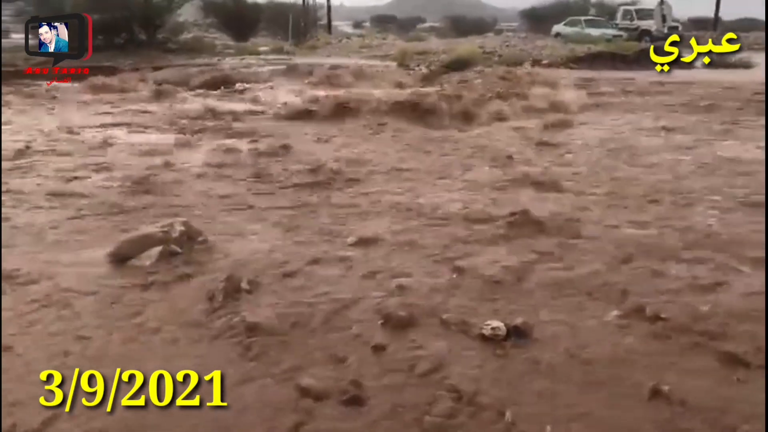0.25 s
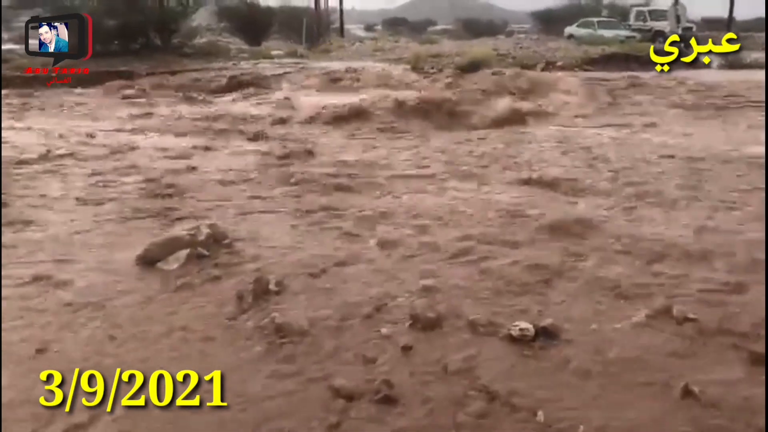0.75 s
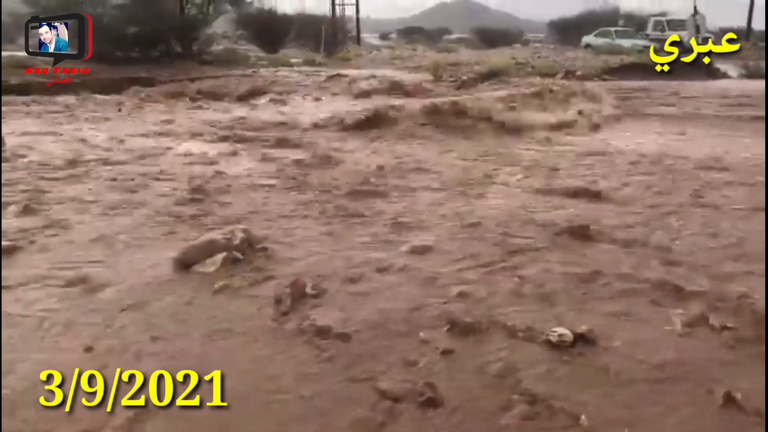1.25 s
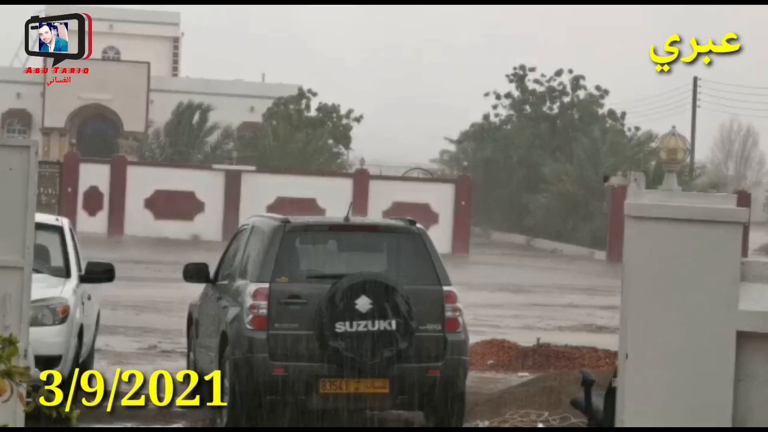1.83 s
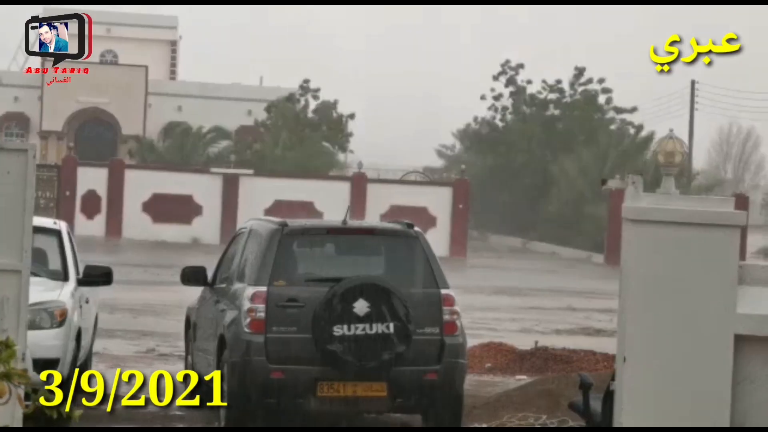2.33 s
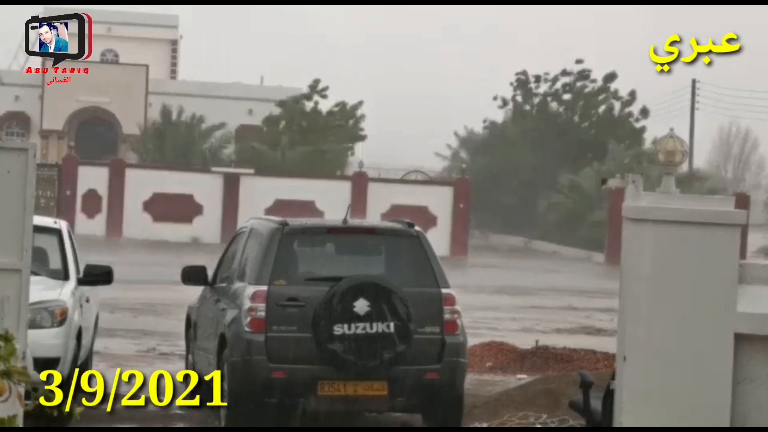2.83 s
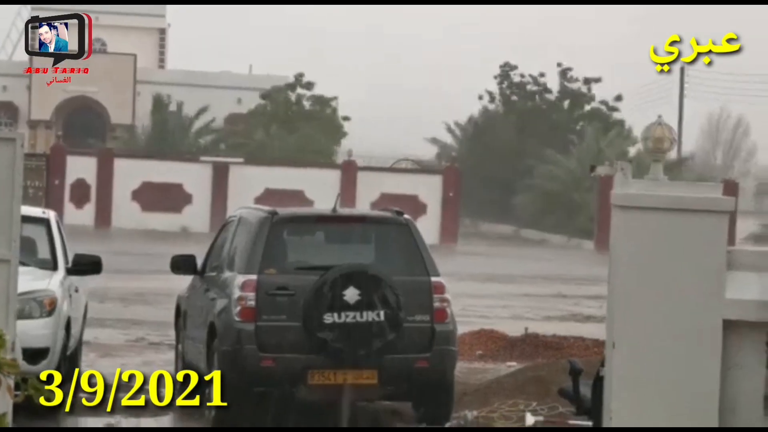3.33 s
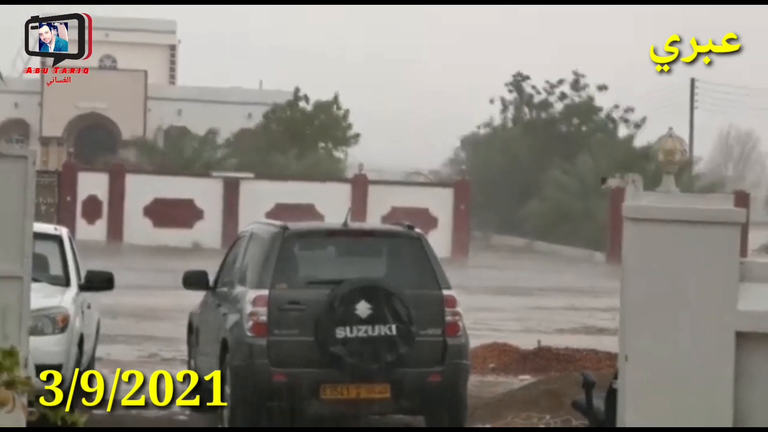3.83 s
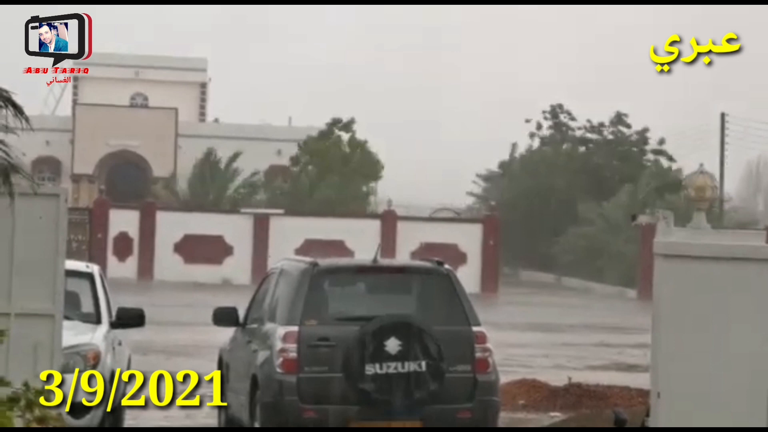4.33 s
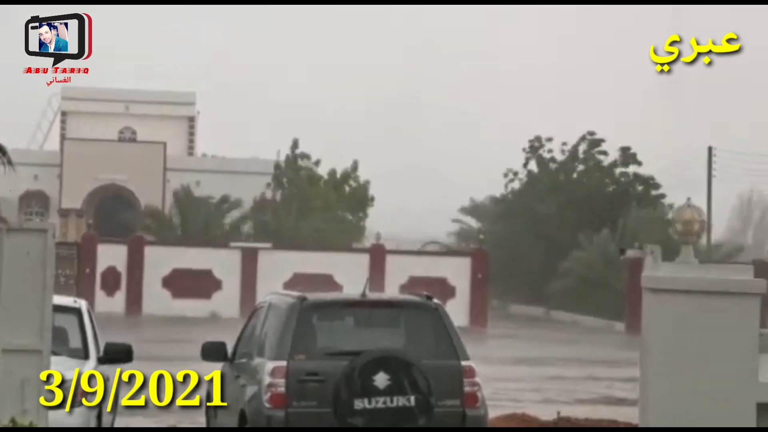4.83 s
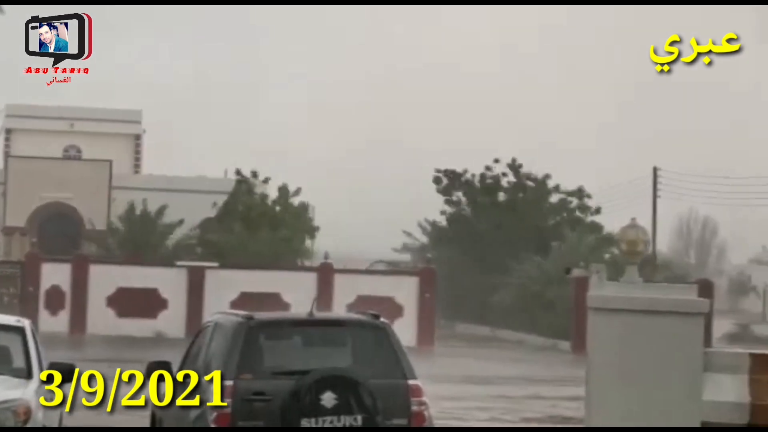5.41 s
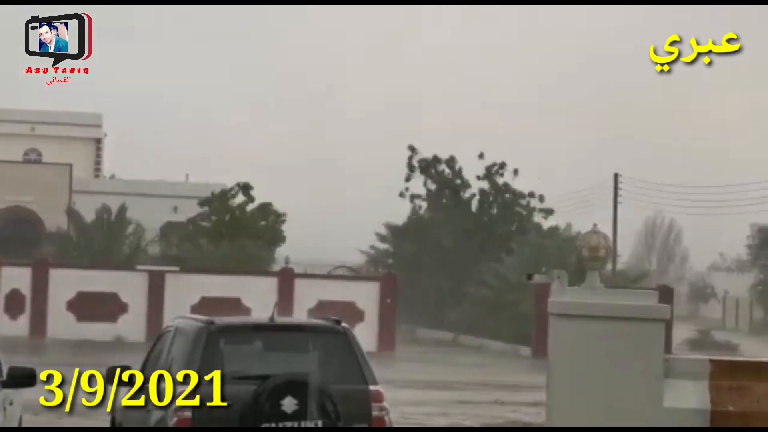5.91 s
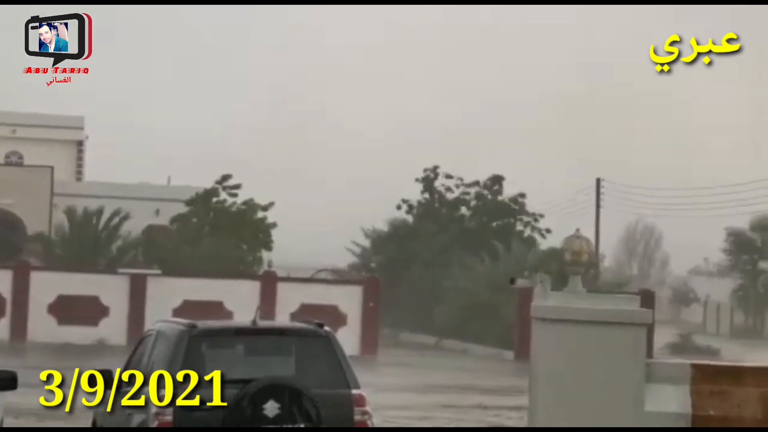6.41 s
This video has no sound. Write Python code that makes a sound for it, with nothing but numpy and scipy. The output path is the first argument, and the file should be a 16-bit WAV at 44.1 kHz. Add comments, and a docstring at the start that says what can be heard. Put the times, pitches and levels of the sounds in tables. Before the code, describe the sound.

Two outdoor scenes are joined by hard cuts. First comes a loud, dull, centred torrent of turbulent water, gurgling and slapping at rocks, with a low motor hum beneath. A brief dead silence follows. Then heavy rain heard from a porch spreads wide, crisp and quieter, with irregular splatters, sharp ticking drops, soft drumming on roofs and cars, and uneven wind rumble until the end.

```python
"""Floodwater, then a downpour

Two scenes joined by a short silence. First, in mono, muddy floodwater roars over stones: shaped noise with
bubble chirps, a hiss of spray, waves slapping as damped air pockets, and an engine drone of wavering sines.
Then, in stereo from a porch, heavy rain hisses on a yard as patchy noise and ringing drops; run-off
splashes close by as noise bursts, roofs drum and wind rumbles as filtered noise, and one low sine hums."""
import sys
import numpy as np
from scipy import signal
from scipy.fft import rfft, irfft, next_fast_len
from scipy.io import wavfile
from scipy.ndimage import uniform_filter1d, map_coordinates

SR = 44100
rng = np.random.default_rng(int(sys.argv[2]) if len(sys.argv) > 2 else 0)


def waveform_to_disk(signal):
    """Save audio, clipped to [-1, 1], as 16-bit WAV at the path in sys.argv[1]."""
    frames = np.transpose(np.atleast_2d(signal))
    scaled = np.clip(frames, -1, 1) * 32767
    samples = np.round(scaled).astype(np.int16)
    wavfile.write(sys.argv[1], SR, samples)


N = 294575
FLOOD_END, RAIN_START = 1.6637, 2.0185  # s

# Tone colour of churning water. Each row: frequency in Hz, relative density in dB per Hz.
ROAR_SPECTRUM = [(15, -53), (30, -30.5), (55, -24), (90, -1.5), (140, -2), (200, -1.5), (350, -1.5),
                 (500, -1.5), (750, -3.5), (1000, -9), (1500, -16), (2500, -21), (5000, -47.5)]
# Single big drops striking close by. Each row: start in seconds, level in dB, pitch in Hz, left over right in dB.
BIG_DROPS = [(2.1648, -22.5, 7460, -3), (2.5715, -23.5, 2930, -5), (3.216, -24, 4760, -2.5),
             (4.5156, -23, 4460, -4), (4.52, -19, 3280, 0), (4.63, -24, 7690, -9), (4.8337, -24, 7770, -9),
             (4.944, -28, 4010, -1.0), (5.3373, -27, 4130, -1.5), (5.805, -23, 6270, -5),
             (6.2956, -21, 6500, -4), (6.306, -23, 6600, -2)]


def amp(db):
    """Decibels to a linear gain."""
    return 10 ** (np.asarray(db) / 20)


def unit(x):
    """x scaled to rms 1."""
    return x / np.sqrt(np.mean(x ** 2) + 1e-20)


def along(points, hz):
    """(Hz, value) points read off along a log frequency axis."""
    f, v = np.transpose(points)
    return np.interp(np.log(hz + 1), np.log(f + 1), v)


def curves(rows):
    """One value per sample for each column after the time."""
    s, *cols = np.transpose(rows)
    return [np.interp(np.arange(N) / SR, s, c) for c in cols]


def wobble(rate):
    """A smooth random curve through rate knots a second."""
    knots = rng.standard_normal(int(N * rate / SR) + 4)
    return map_coordinates(knots, [np.arange(N) * rate / SR])


def filtered(x, response):
    """x through a gain given as a function of frequency."""
    m = next_fast_len(N + SR // 4)
    return irfft(rfft(x, m) * response(np.fft.rfftfreq(m, 1 / SR)), m)[..., :N]


def coloured(x, spectrum):
    """x through a (Hz, dB) spectrum, at rms 1."""
    return unit(filtered(x, lambda hz: amp(along(spectrum, hz))))


def patchy(patchy_db, size=(6, 6)):
    """Two white noises sharing patches of random gain, size = (frequency bins, time frames)."""
    z = signal.stft(rng.standard_normal((2, N)), nperseg=512)[2]
    field = rng.standard_normal(z.shape[1:])
    field = uniform_filter1d(field, size=size[0], axis=0)
    field = uniform_filter1d(field, size=size[1], axis=1)
    return signal.istft(z * amp(patchy_db * unit(field)), nperseg=512)[1][:, :N]


def grains(count, size, until, mid_hz, octaves, cycles, spread_db, pan_db, lag):
    """Scattered damped sines of rising pitch, each with its own level and time offset between channels."""
    when, big, turn = rng.random((3, count))
    hz = np.minimum(mid_hz * 2 ** (octaves * rng.standard_normal(count)), SR / 3)[:, None]
    t = np.arange(size) / SR
    chirp = np.sin(2 * np.pi * hz * t * (1 + 0.074 * hz * t / cycles))
    shape = chirp * np.exp(-hz * t / cycles) * np.hanning(2 * size)[size:]
    shape *= amp(-spread_db * np.log(big + 0.013))[:, None]  # a few grains stand out
    out = []
    for side in (1, -1):  # left, right
        start = (when * until * SR + SR * lag * (1 + side * (2 * turn - 1))).astype(int)
        weights = shape * amp(-side * pan_db * 2 * turn)[:, None]  # from even to leaning right
        index = (start[:, None] + np.arange(size)).ravel()
        out.append(np.bincount(index, weights.ravel(), N + SR)[:N])
    return np.array(out) / np.sqrt(np.sum(shape ** 2) / (until * SR))


def tone(hz, db, waver_hz):
    """A sine around a given pitch and rms level whose pitch and strength waver."""
    level = np.sqrt(2) * amp(db + 1.5 * wobble(23))
    phase = 2 * np.pi * np.cumsum(hz + waver_hz * wobble(14)) / SR
    return level * np.sin(phase)


def flood():
    """Turbulent water: a churning roar with big bubbles ringing in it, and the smooth hiss of spray."""
    # Swell of the roar. Each row: time in seconds, level in dB.
    roar_swell = [(0, -25.5), (.3, -26), (.38, -26.5), (.54, -26), (1.05, -25.5), (1.45, -25.5),
                  (1.66, -27.5)]
    # Tone colour of the spray. Each row: frequency in Hz, relative density in dB per Hz.
    spray_spectrum = [(710, -40), (1200, -5.5), (1580, -8), (3210, -6.5), (4040, -10.5), (5600, -10),
                      (8440, -15), (10700, -21), (11800, -25), (15300, -55.5), (22000, -120)]
    bubble_db, spray_db = -5.5, -35  # bubbles relative to the churn; spray rms
    roar_db, = curves(roar_swell)
    churn, fizz = patchy(0.93)[0], patchy(0.93)[0]
    bubbles = grains(count=900, size=900, until=FLOOD_END, mid_hz=380, octaves=.8, cycles=2.4,
                     spread_db=2, pan_db=0, lag=0)[0]
    roar = coloured(churn, ROAR_SPECTRUM) + amp(bubble_db) * bubbles
    roar *= amp(roar_db + 0.33 * wobble(8.9))
    spray = amp(spray_db) * coloured(fizz, spray_spectrum)
    return roar + spray


def engine():
    """An engine drone under the roar: three sines at one, two and three times the firing rate."""
    # The engine's changing pace. Each row: time in seconds, firing rate in Hz, third-order level in dB.
    engine_pace = [(0.0, 40, -44), (0.1, 40.5, -35), (0.208, 42.5, -41), (0.294, 42.4, -32),
                   (0.396, 39.8, -41), (0.452, 39.55, -30.5), (0.818, 35.96, -34), (1.03, 36.5, -35),
                   (1.054, 36.2, -38), (1.206, 39, -30.5), (1.446, 36.76, -36), (1.66, 34.2, -33)]
    first_db, second_db = -45, -41  # levels of the lower orders
    hz, third_db = curves(engine_pace)
    third = tone(3 * hz, third_db, waver_hz=2.5)
    first = tone(hz, first_db, waver_hz=1.1)
    second = tone(2 * hz, second_db, waver_hz=3.5)
    return first + second + third


def slaps():
    """Each wave hitting stones shakes an air pocket for a few cycles and throws a short churn of noise."""
    # Each row: start in seconds, level in dB, air pocket pitch in Hz, stone knock relative to the slap in dB.
    slap_rows = [(0.032, -6, 414, -22.5), (0.125, -13, 480, -4), (0.135, -11, 483, -11),
                 (0.216, -11.5, 292, -13), (0.404, -12, 320, -3.5), (0.412, -10, 500, -11.5),
                 (0.428, -18, 200, -13), (0.444, -12, 290, -9), (0.5739, -10.5, 300, -1),
                 (0.582, -14.5, 170, -9), (0.59, -9, 850, -10.5), (0.644, -21, 200, -12),
                 (0.659, -27, 125, -14.5), (.697, -11.5, 618, -1), (.713, -8.5, 960, -9),
                 (0.758, -12, 378, -3), (.914, -23, 554, -8), (.98, -11.5, 408, -14),
                 (0.984, -19, 110, -15), (1.011, -19, 100, -8), (1.1, -15.5, 350, -5.5),
                 (1.363, -11.5, 257.6, 0), (1.479, -11, 324, -11), (1.627, -14.5, 430, -8.5)]
    out, t = np.zeros(N + SR), np.arange(SR // 10) / SR
    churn = coloured(rng.standard_normal(N), ROAR_SPECTRUM)
    onset = 1 - np.exp(-t / 0.0012)
    knock = np.sin(2 * np.pi * 620 * t) * np.exp(-t / 0.003)  # stone against stone
    for s, db, hz, knock_db in slap_rows:
        at = round(s * SR)
        pocket = np.sin(2 * np.pi * hz * t) * np.exp(-hz * t / 1.26)
        thrown = churn[at:][:len(t)] * np.exp(-t / 0.0071)
        slap = 1.3 * pocket + amp(knock_db) * knock + 0.27 * thrown
        out[at:][:len(t)] -= amp(db) * onset * slap
    return out[:N]


def channel_colour(hz):
    """Tone colour of the rain and splashes in each channel."""
    # Each row: frequency in Hz, gain in dB.
    left_colour = [(900, -7), (1600, -2), (2400, -1), (2900, -1.5), (3080, 1), (3280, -2), (3800, -2.5),
                   (4020, 1), (4700, -0.5), (5200, -5), (5400, -3.5), (6300, -8.5), (8300, -5),
                   (9200, -2.5), (10100, -6), (10700, -3.5), (12900, -12), (14500, -17), (16000, -16.5)]
    right_colour = [(900, -7), (1600, -3), (2400, -1), (2900, -2), (3080, -1), (3280, -5.5), (3800, -3),
                    (4020, -1.5), (4700, -3.5), (5200, -2.5), (5400, -10.5), (6900, -2), (7800, -1.5),
                    (8500, -8.5), (9300, -6), (10200, -16), (10700, -12.5), (12300, -10), (14500, -18.5),
                    (16000, -23)]
    return amp([along(left_colour, hz), along(right_colour, hz)])


def diffuse(pair):
    """Two noises mixed into a wide stereo field: left and right are alike in the bass, less so above."""
    # Each row: frequency in Hz, left-right correlation from -1 to 1.
    likeness = [(25, 1), (60, 1), (110, 0.96), (250, 0.97), (500, 0.83), (860, 0.59), (1200, 0.084),
                (1750, -0.51), (2150, 0.19), (2600, 0.28), (3500, -0.033), (4200, 0.057), (16000, -0.053)]

    def mid_side(hz):
        turn = np.arccos(np.clip(along(likeness, hz), -1, 1)) / 2
        return np.array([np.cos(turn), np.sin(turn)])

    mid, side = filtered(pair, mid_side)
    return np.array([mid + side, mid - side])


def rainfall():
    """Far drops merge into a patchy hiss; near ones patter and ring in puddles."""
    # Sheets of rain thicken and thin. Each row: time in seconds, hiss level in dB.
    sheets = [(2.02, -34), (2.25, -34.5), (2.5, -33.5), (2.7, -34.5), (2.8, -35.5), (3.25, -34.5),
              (3.45, -33.5), (4.1, -33.5), (4.25, -34.5), (4.8, -34), (5.4, -35), (5.57, -33),
              (5.71, -37.5), (5.79, -34), (6.0, -35), (6.4, -35), (6.68, -35)]
    patter_db, plink_db = -11, -11  # near drops and ringing drops, relative to the hiss noise
    hiss_db, = curves(sheets)
    patter = grains(count=6000, size=110, until=N / SR, mid_hz=7500, octaves=.6, cycles=2,
                    spread_db=3.5, pan_db=4, lag=.0002)
    plinks = grains(count=9000, size=300, until=N / SR, mid_hz=4800, octaves=.4, cycles=7,
                    spread_db=1.6, pan_db=2, lag=.0002)
    hiss = diffuse(patchy(2.4, size=(12, 5)))
    fall = hiss + amp(patter_db) * patter + amp(plink_db) * plinks
    return amp(hiss_db) * unit(filtered(fall, channel_colour))


def drumming_and_wind():
    """Rain drums on roofs and cars as mid-low noise; uneven wind rumbles beneath it."""
    # Each row: time in seconds, drumming level in dB, rumble level in dB.
    low_levels = [(2.03, -42, -45), (2.27, -49, -55), (2.33, -47, -46.5), (2.96, -44, -44.5),
                  (2.99, -51, -46), (3.09, -44.5, -45), (4.02, -41, -43), (4.66, -47, -47),
                  (5.45, -40, -52), (5.69, -42.5, -47.5), (5.71, -45, -61), (5.76, -44.5, -44),
                  (5.84, -44.5, -55), (5.98, -41.5, -43), (6.07, -43.5, -51.5), (6.39, -47, -48),
                  (6.59, -41, -47), (6.68, -44, -48)]
    # Tone colours of the drumming and the wind. Each row: frequency in Hz, relative density in dB per Hz.
    drum_spectrum = [(150, -7), (350, -8.5), (500, -6), (800, -1.5), (1000, -4), (1500, -9), (3000, -70)]
    wind_spectrum = [(12, -38), (20, -4), (43, -11), (76, -5), (131, -8), (257, -7), (297, -10), (347, -9),
                     (450, -14), (580, -25), (990, -120)]
    gust_db = 1.2  # unevenness of the rumble
    drum_db, rumble_db = curves(low_levels)
    drumming = coloured(diffuse(patchy(0.96)), drum_spectrum)
    rumble = amp(gust_db * wobble(9)) * coloured(diffuse(patchy(0.94)), wind_spectrum)
    return amp(drum_db) * drumming + amp(rumble_db) * rumble


def low_hum():
    """A low sine that swells, fades and wavers in pitch."""
    # Each row: time in seconds, hum level in dB.
    hum_swell = [(2.02, -52), (3.1, -62), (3.3, -48), (3.6, -61), (3.75, -49), (4.2, -48), (4.32, -71),
                 (4.75, -47.5), (4.96, -61), (5.45, -63), (5.6, -49.5), (5.9, -66), (6.0, -50.5),
                 (6.35, -56.5), (6.68, -54)]
    return tone(70.6, *curves(hum_swell), waver_hz=6.54)


def small_splashes(count=200):
    """Rows for many weaker splashes at random moments and pitches; stronger ones last longer."""
    weakest_db, range_db, pan_db = -39, 6, -13  # pan is left over right
    lowest_hz, pitch_span = 3000, 2.6  # span is highest pitch over lowest
    t60, t60_growth = 0.033, 0.021  # s, decay of the weakest and the extra for the strongest
    when, size, pitch = rng.random((count, 3)).T
    start = RAIN_START + when * (N / SR - RAIN_START)
    return np.transpose([start, weakest_db + range_db * size, lowest_hz * pitch_span ** pitch,
                         np.full(count, pan_db), t60 + t60_growth * size])


def droplets(hz, t60, t):
    """Droplets as rough noise around one pitch, a higher band and a broad spray, different in each channel."""
    rough_db, rise_share, hold_share = 2.0, .05, 0.16  # shares are of the decay time
    t60 = max(t60, .005)
    roughness = amp(rough_db * rng.standard_normal((2, len(t) // 32 + 1))).repeat(32, axis=1)
    crackle = rng.standard_normal((2, len(t))) * roughness[:, :len(t)]
    band = signal.butter(2, [hz / 1.128, min(hz * 1.188, SR / 2.2)], "bandpass", fs=SR)
    # smaller droplets ring higher
    finer = signal.butter(2, [min(hz * 1.18, SR / 2.4), min(hz * 2.05, SR / 2.2)], "bandpass", fs=SR)
    main, fine = unit(signal.lfilter(*band, crackle)), unit(signal.lfilter(*finer, crackle))
    burst = main + 0.73 * fine + 1.27 * unit(crackle)
    rise = 1 - np.exp(-t / (rise_share * t60))
    return burst * rise * amp(-60 * np.maximum(t / t60 - hold_share, 0))


def panned(db, pan_db):
    """Left and right gains around one level, pan_db apart."""
    return amp(db + np.array([[.5], [-.5]]) * pan_db)


def splashes():
    """Falling run-off and big drops break into clumps of droplets, with a different mix of them per channel."""
    # The loudest run-off splashes. Each row: start in seconds, level in dB, pitch in Hz,
    # left over right in dB, time to decay by 60 dB in seconds.
    runoff = [(2.053, -28, 3830, -7, 0.066), (2.1, -31, 3460, -10, 0.062), (2.142, -39, 4700, -11, 0.04),
              (2.162, -30, 4600, -11, 0.054), (2.214, -26, 3420, -4, 0.063), (2.292, -27, 4200, -3, 0.121),
              (2.314, -33, 7700, -8, 0.026), (2.426, -25, 4500, -3, 0.054), (2.449, -23, 2900, -5, 0.081),
              (2.477, -25.5, 3850, -6, 0.079), (2.517, -23, 3140, -5, 0.043), (2.6, -32, 4770, -5, 0.073),
              (2.658, -25, 3480, -2, 0.086), (2.669, -28, 4900, -7, 0.033), (2.679, -25.5, 3400, -4, 0.15),
              (2.72, -31, 6500, -5, 0.055), (2.799, -29, 3480, -6, 0.12), (2.936, -31, 3900, -10, 0.077),
              (3.004, -26.5, 3220, -5, 0.092), (3.125, -27.5, 2720, -5, 0.12), (3.147, -29, 4700, -4, 0.04),
              (3.182, -28.5, 4180, -4, 0.055), (3.195, -28, 7540, -8, 0.033), (3.208, -29, 4770, -4, 0.11),
              (3.236, -29, 3500, -8, 0.03), (3.287, -26, 4500, -4, 0.03), (3.31, -28, 3970, -4, 0.068),
              (3.417, -28.5, 2830, -2, 0.15), (3.459, -31, 4400, -3, 0.069), (3.696, -30, 4570, -2, 0.056),
              (3.78, -29.5, 4000, -1, 0.15), (3.837, -30, 2520, -4, 0.115), (3.942, -28, 3900, -1, 0.095),
              (4.042, -29, 4700, 2, 0.12), (4.099, -28.5, 3300, -3, 0.16), (4.12, -27, 4600, -4, 0.079),
              (4.172, -29, 3900, -4, 0.046), (4.27, -35, 2800, -3, 0.065), (4.316, -19.5, 2600, -5, 0.035),
              (4.32, -27, 4230, 1, 0.05), (4.326, -22.5, 2930, -5, 0.035), (4.337, -25, 2600, -6, 0.057),
              (4.41, -27, 2980, -5, 0.058), (4.458, -25, 3000, -5, 0.044), (4.481, -26, 2940, -4, 0.054),
              (4.51, -32, 4370, -4, 0.054), (4.567, -26, 4100, -6, 0.12), (4.626, -33, 7800, -13, 0.026),
              (4.772, -27, 2580, -5, 0.087), (4.821, -29, 7700, -8, 0.063), (4.855, -35, 7800, -10, 0.043),
              (4.934, -29, 4380, -6, 0.082), (5.048, -24.5, 4850, -2, 0.092),
              (5.094, -26.5, 4550, -5, 0.075), (5.134, -32, 3300, -8, 0.11), (5.225, -27, 7900, -7, 0.089),
              (5.284, -28, 2820, -5, 0.076), (5.332, -33, 4400, -5, 0.13), (5.438, -36, 3320, -3, 0.068),
              (5.521, -33, 4000, -4, 0.032), (5.536, -26, 3600, -2, 0.05), (5.623, -30, 3730, -6, 0.078),
              (5.675, -29.5, 7800, -10, 0.062), (5.785, -28, 3200, -8, 0.028), (5.796, -28, 4700, -6, 0.06),
              (5.852, -32.5, 1990, -3, 0.18), (5.879, -29, 2080, -2, 0.037),
              (6.024, -25.5, 4470, -1, 0.066), (6.054, -30, 4400, -4, 0.06), (6.127, -30, 7200, -4, 0.15),
              (6.225, -29, 4700, -5, 0.07), (6.29, -24.5, 5440, -8, 0.092), (6.483, -31, 3300, 1, 0.13),
              (6.506, -36, 2900, -2, 0.033), (6.603, -28, 4800, -4, 0.096), (6.64, -25.5, 4900, -7, 0.047)]
    big_drop_t60, crest_db = 0.014, 7  # s; headroom taken off each burst for its peaks
    out, t = np.zeros((2, N + SR)), np.arange(SR // 8) / SR
    drop_sprays = [(*row, big_drop_t60) for row in BIG_DROPS]
    for s, db, hz, pan_db, t60 in [*runoff, *drop_sprays, *small_splashes()]:
        burst = droplets(hz, t60, t)
        out[:, round(s * SR):][:, :len(t)] += panned(db - crest_db, pan_db) * burst
    return out[:, :N]


def snaps():
    """The strike of each big drop itself: one sharp, very short sine."""
    snap_db, snap_t60 = 2, 0.0025  # relative to the drop's level; s
    out, t = np.zeros((2, N + SR)), np.arange(SR // 8) / SR
    for s, db, hz, pan_db in BIG_DROPS:
        snap = np.sin(2 * np.pi * hz * t) * amp(snap_db - 60 * t / snap_t60)
        out[:, round(s * SR):][:, :len(t)] += panned(db, pan_db) * snap
    return out[:, :N]


def scene():
    """The mono flood has a narrower band than the stereo rain; hard cuts frame the silence."""
    s = np.arange(N) / SR

    def narrow(hz):
        treble_cut = np.clip((11950 + 250 - hz) / 500, 0, 1) ** 3
        bass_cut = hz ** 2 / (hz ** 2 + 30 ** 2)
        return treble_cut * bass_cut

    water = filtered(flood() + slaps() + engine(), narrow)
    close_drops = filtered(splashes() + snaps(), channel_colour)
    downpour = rainfall() + drumming_and_wind() + low_hum() + close_drops
    water_gate = np.clip((FLOOD_END - s) / .001, 0, 1)
    rain_gate = np.clip((s - RAIN_START) / .002, 0, 1)
    return water * water_gate + downpour * rain_gate


def record(dry):
    """Nothing is kept above the band limit."""
    top_hz = 15800
    return filtered(dry, lambda hz: np.clip((top_hz - hz) / 150, 0, 1))


dry = scene()
out = record(dry)
waveform_to_disk(out)
```